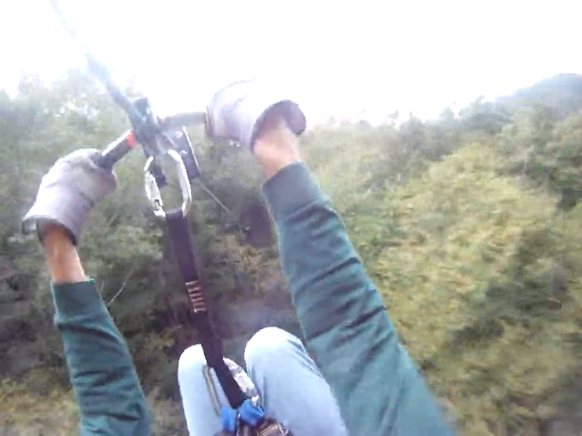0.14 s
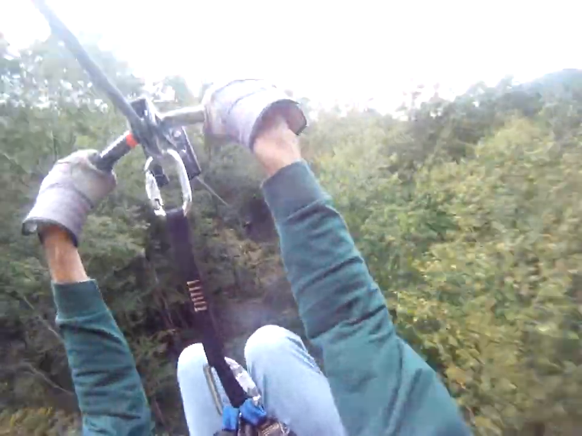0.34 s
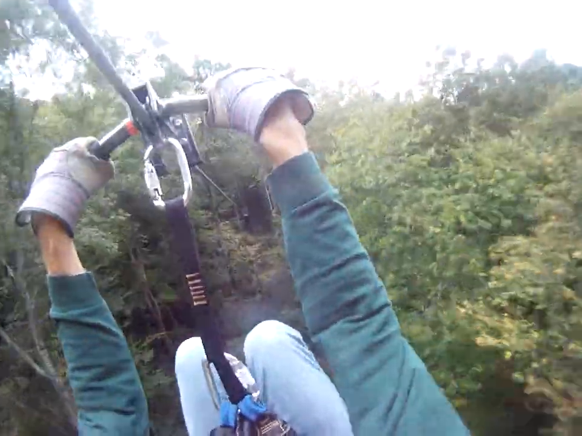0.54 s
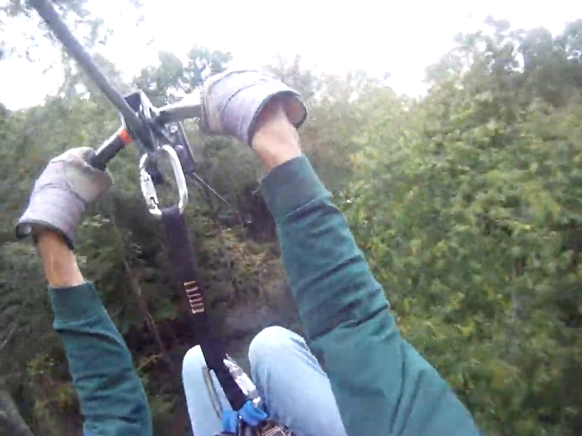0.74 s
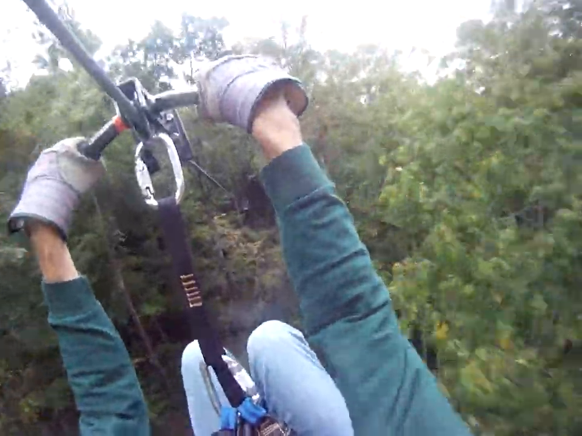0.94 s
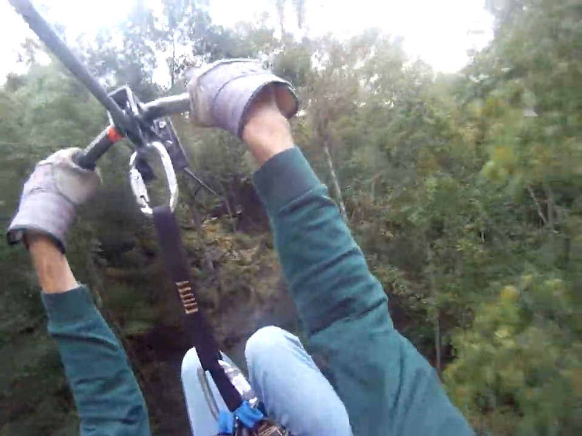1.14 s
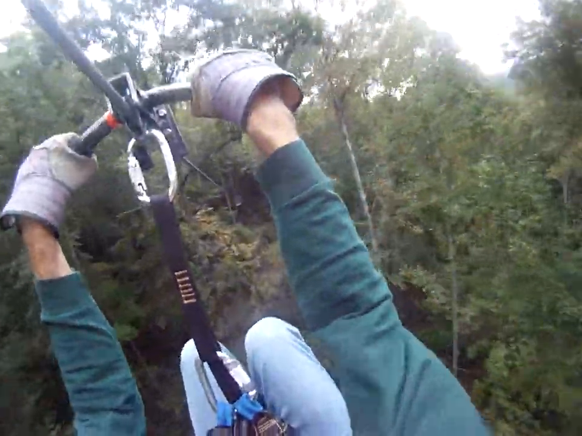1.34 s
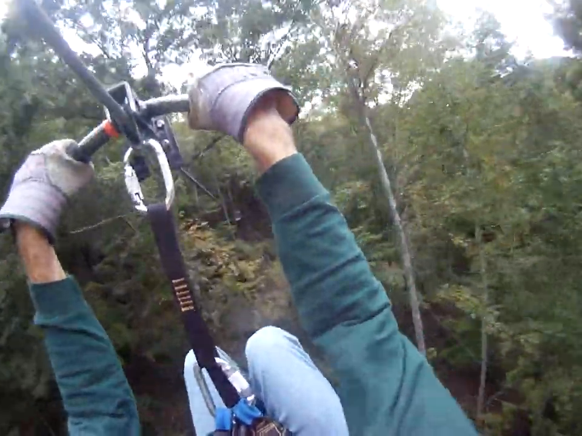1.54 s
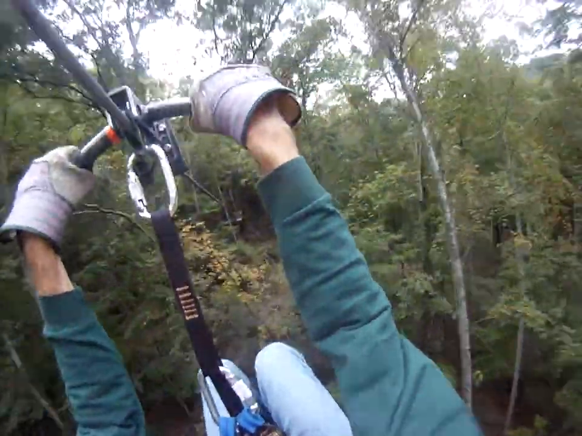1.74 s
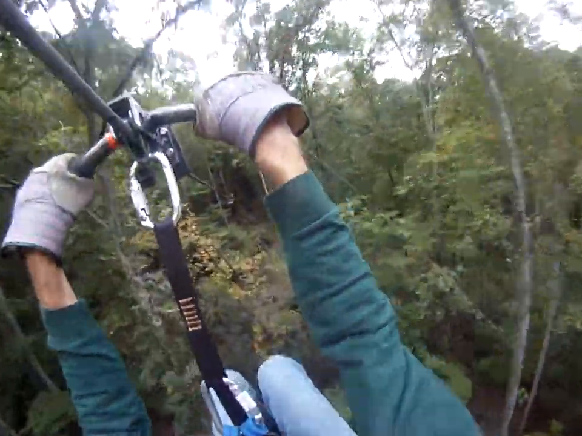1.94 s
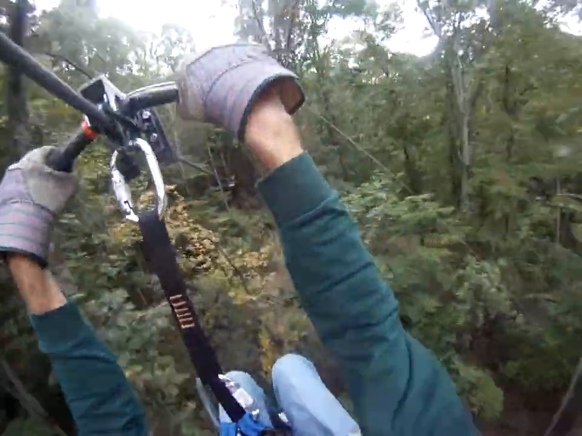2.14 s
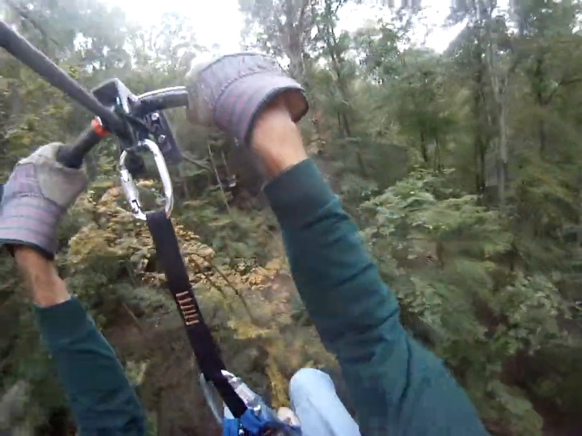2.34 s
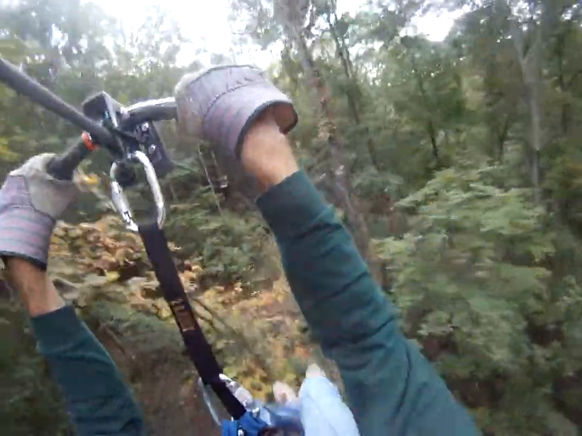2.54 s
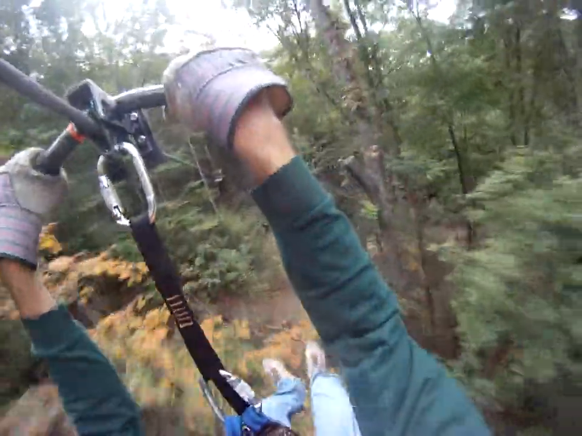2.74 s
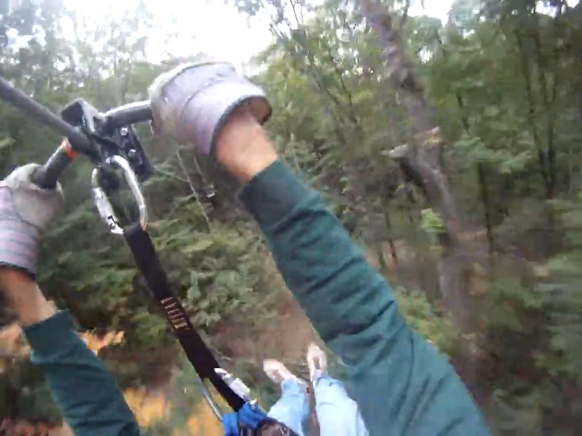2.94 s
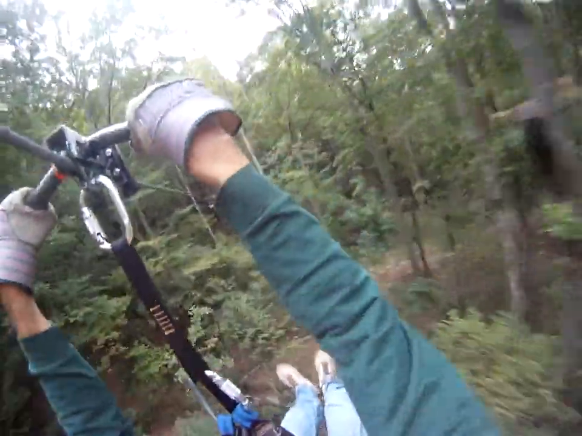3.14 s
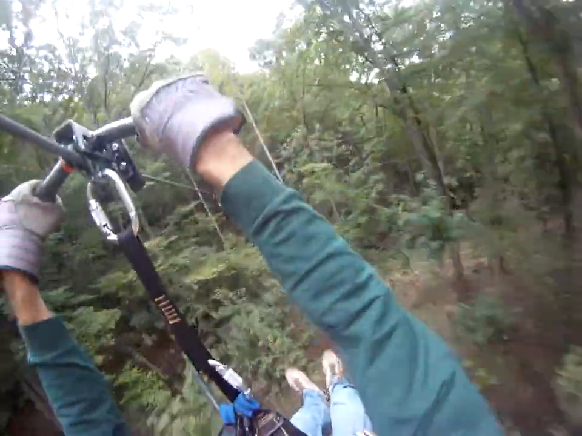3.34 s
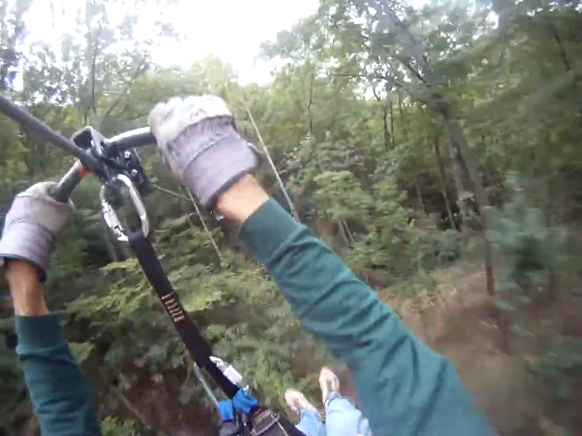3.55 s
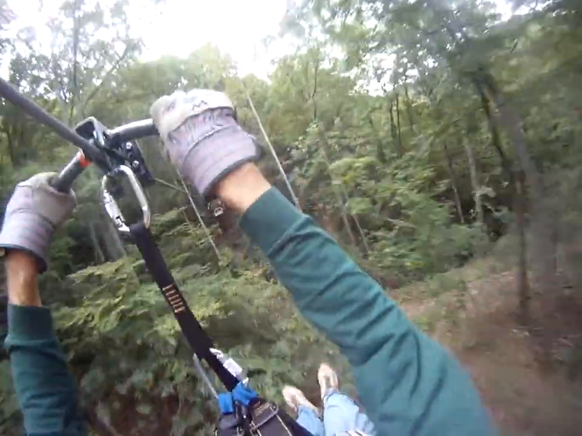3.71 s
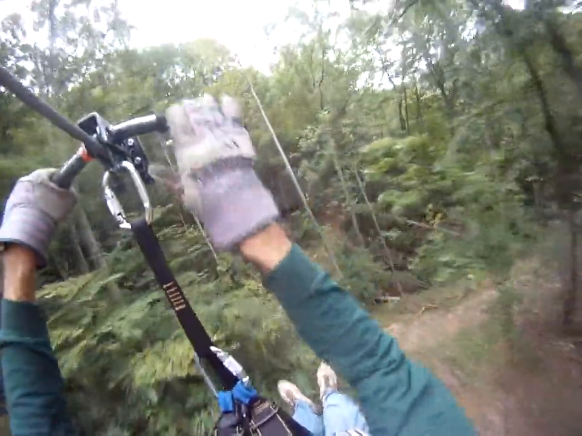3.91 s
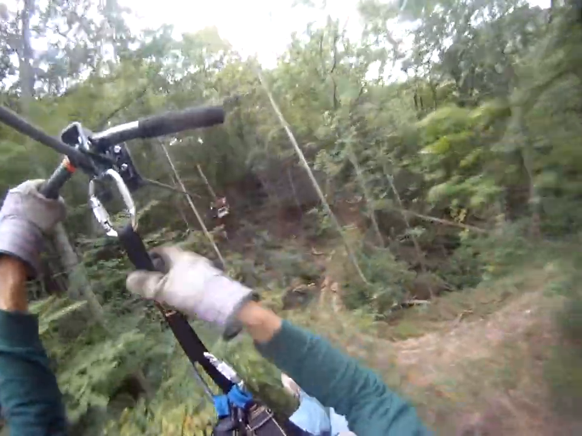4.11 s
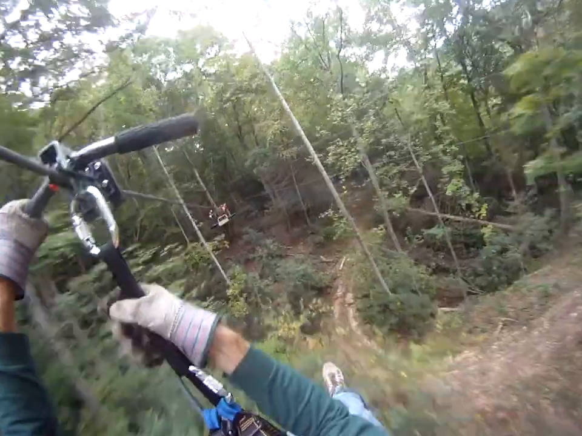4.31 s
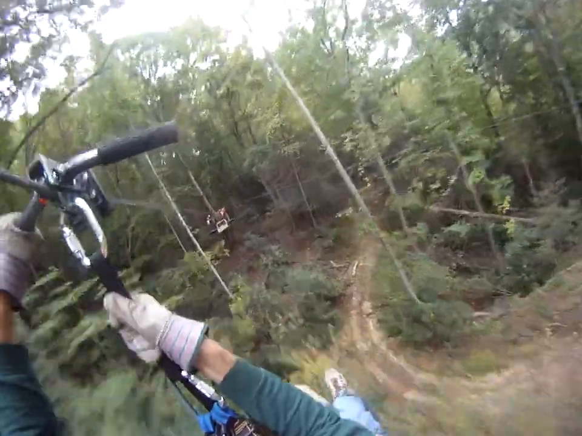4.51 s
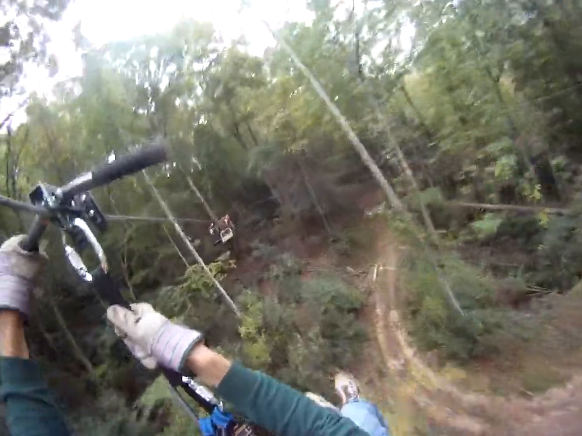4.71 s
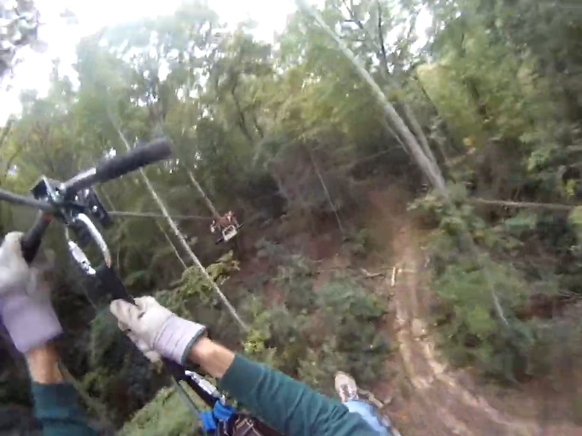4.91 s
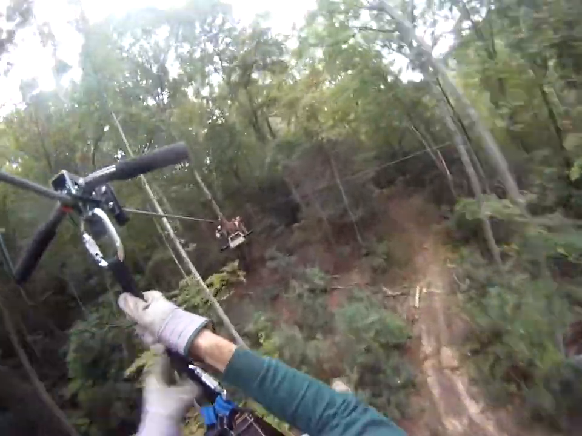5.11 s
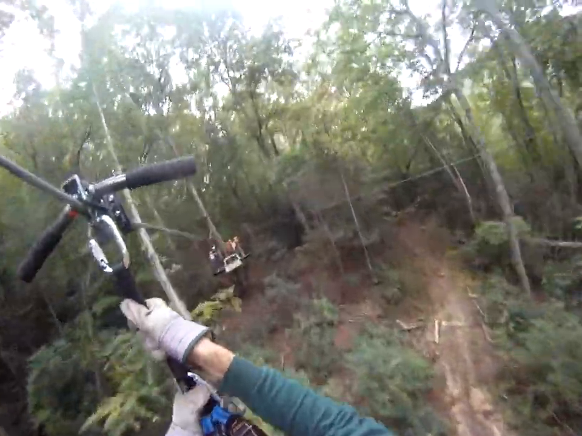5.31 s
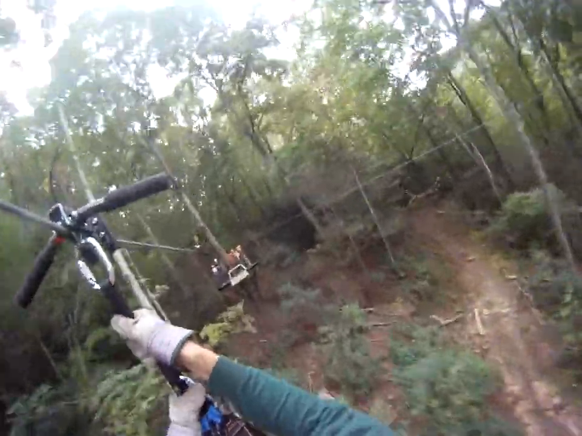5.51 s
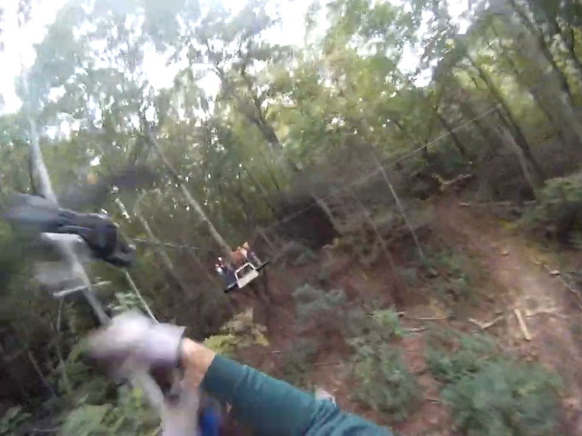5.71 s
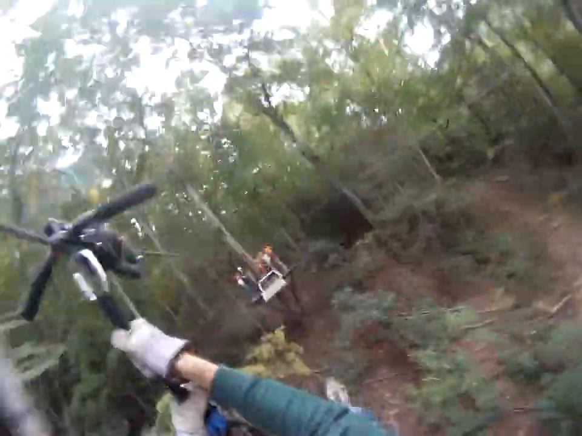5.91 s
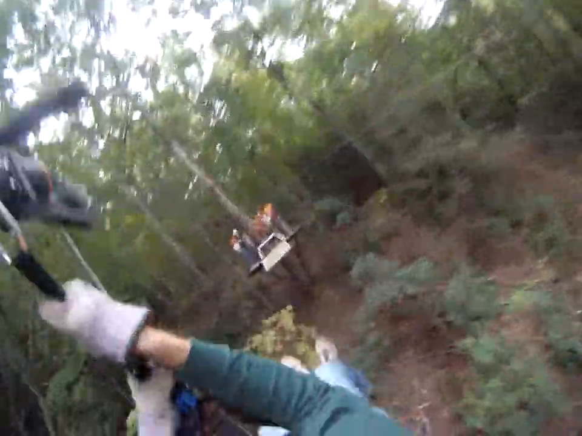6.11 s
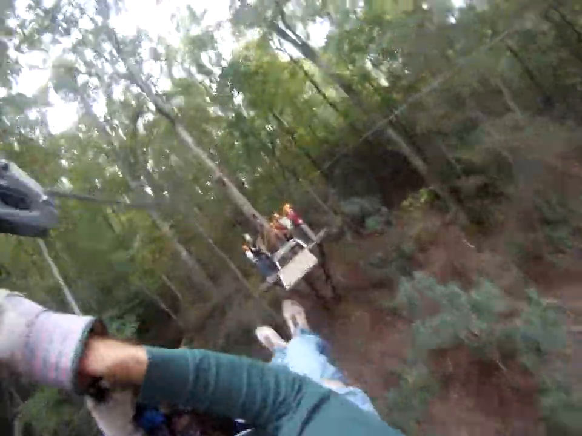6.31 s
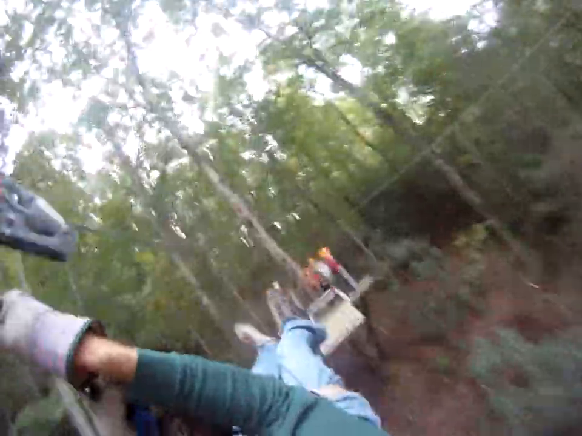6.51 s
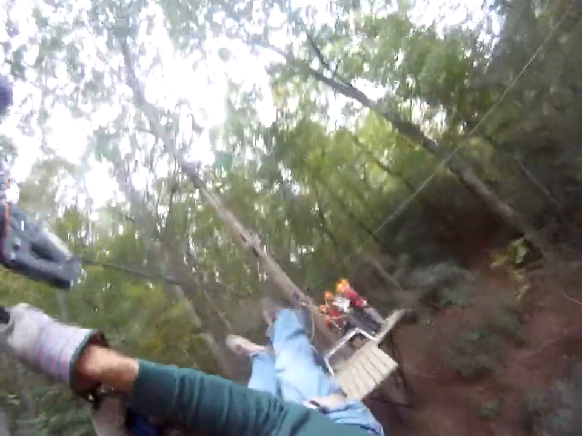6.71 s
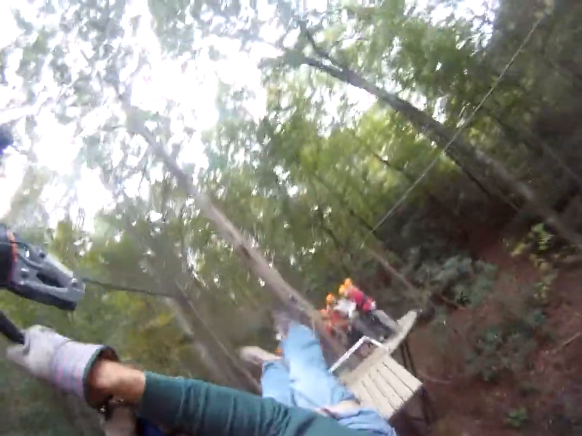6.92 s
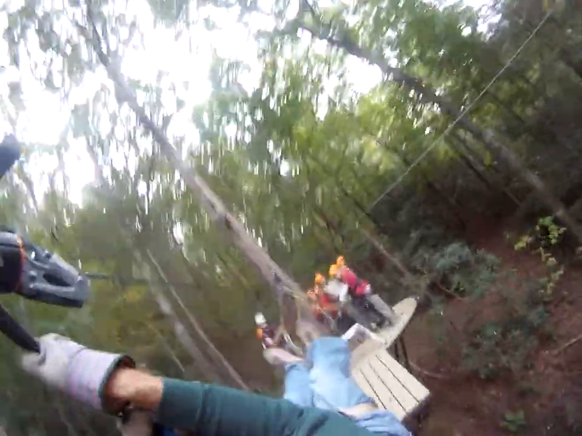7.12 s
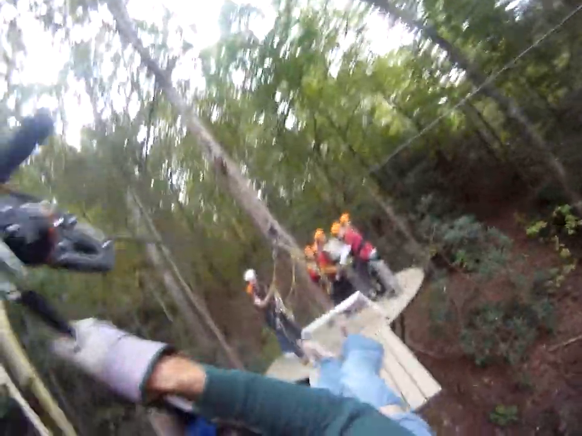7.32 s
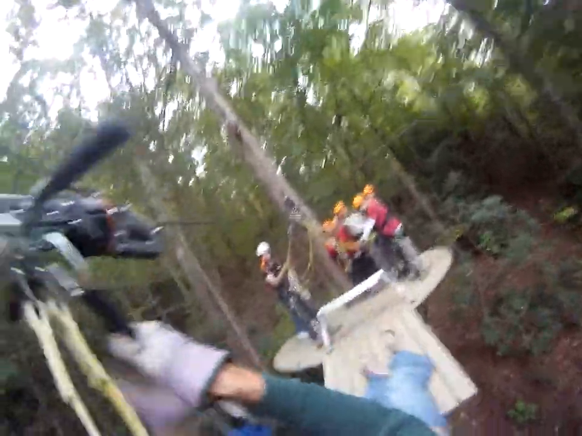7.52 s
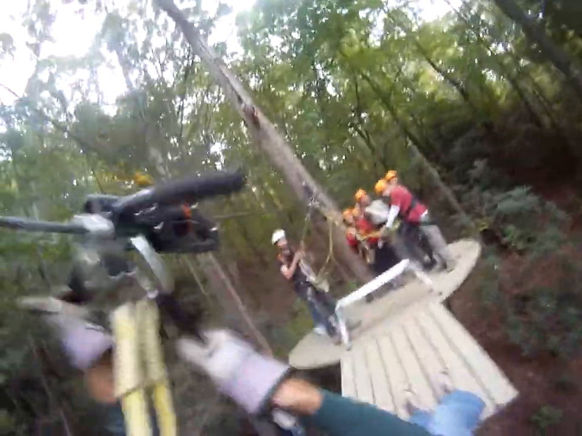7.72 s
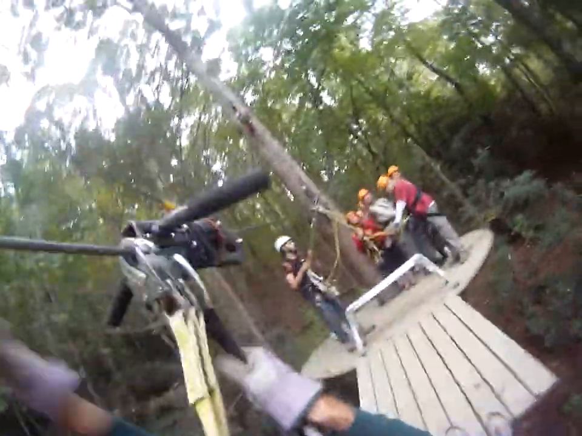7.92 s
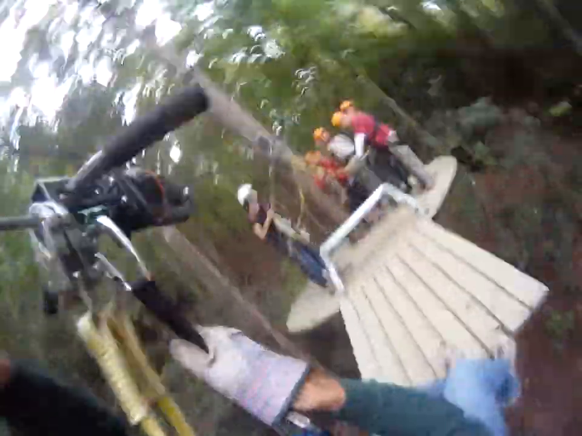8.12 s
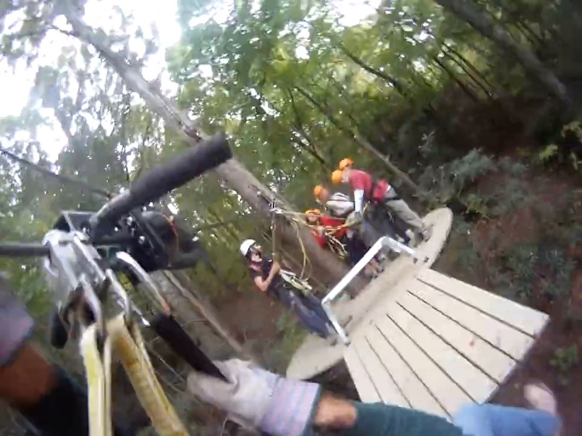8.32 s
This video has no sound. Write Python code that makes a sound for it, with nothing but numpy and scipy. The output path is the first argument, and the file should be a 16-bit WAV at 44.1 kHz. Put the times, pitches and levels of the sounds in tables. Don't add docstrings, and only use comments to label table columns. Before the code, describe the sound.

A bright, buzzing zip-line whir fills the first part, with gusts rumbling against the microphone case and brief squeaks from dry wheels. A sudden cluster of metal bangs and thumps marks the brake, followed by short squeals, a hard knock and a juddering scrape that slows down. Only soft rattles, fabric rubs and faint wind remain. The sound is lo-fi, with gritty, mirrored treble.

```python
import sys
import numpy as np
from scipy import signal
from scipy.fft import rfft, irfft, next_fast_len
from scipy.io import wavfile
from scipy.ndimage import uniform_filter1d

SR = 44100
rng = np.random.default_rng(int(sys.argv[2]) if len(sys.argv) > 2 else 0)


def nominal_scale(level):
    x = np.asarray(level, float) / 20
    return 10 ** x


def generate_wav(signal):
    frames = np.transpose(np.atleast_2d(signal))
    scaled = np.clip(frames, -1, 1) * 32767
    pcm = np.round(scaled).astype(np.int16)
    wavfile.write(sys.argv[1], SR, pcm)


N = 368235
T = np.arange(N) / SR
HOLD_RATE = 12000
BRAKE_S = 5.797


def noise():
    return rng.standard_normal(N)


def unit(x):
    return x / np.sqrt(np.mean(x ** 2))


def smooth_twice(x, size):
    return uniform_filter1d(uniform_filter1d(x, size), size)


def walk(rate):
    hold = int(SR / rate)
    levels = rng.standard_normal(N // 100)[:N // hold + 1]
    return unit(smooth_twice(np.repeat(levels, hold), hold)[:N])


def ring(x, modes):
    size = next_fast_len(N)
    f = np.arange(size * HOLD_RATE // (2 * SR)) * SR / size
    power = 0
    for hz, width, db in modes:
        detune = (f - hz ** 2 / (f + 1)) / width
        power = power + (nominal_scale(db) / (1 + detune ** 2)) ** 2
    return irfft(rfft(x, size)[:len(f)] * np.sqrt(power), size)[:N]


def columns(table):
    s, *cols = np.transpose(table)
    return [np.interp(T, s, c) for c in cols]


def window(s, length, edge_s):
    return np.clip(np.minimum(T - s, s + length - T) / edge_s, 0, 1)


def gate(events, edge_s):
    return sum(nominal_scale(db) * window(s, length, edge_s) for s, length, db in events)


def add(out, s, x):
    i = int(s * SR)
    out[i:i + len(x)] += x[:N - i]


# time in seconds, beat in Hz.
STRAND_BEAT = [(0, 924), (.66, 935), (.85, 955), (1.32, 964), (1.67, 961), (2.2, 998.6), (3.6, 985),
               (4.3, 968), (5.05, 953), (5.2, 920), (5.79, 909), (6.2, 743.4), (6.5, 591), (6.95, 411.3),
               (7.4, 268.4), (7.8, 149.4), (8.35, 60)]


def strand_hz():
    return columns(STRAND_BEAT)[0]


# start in seconds, length in seconds, rise in dB.
GUSTS = [
    (-.1, 0.81, 2.5),
    (1.312, 0.55, 2),
    (1.994, .7, 0),
    (3.5, 0.58, 1.5),
    (5.302, 0.56, -1),
    (6.0, .5, 2),
    (7.55, 0.57, 3.5),
]


def airflow(swing):
    hz = strand_hz()
    gusts_db = sum(db * window(s, length, 0.18) for s, length, db in GUSTS)
    full_speed_db, shelter_db, sway_db = -31, -2.5, -44.5
    moving = nominal_scale(full_speed_db + shelter_db * swing) * (hz / hz.max()) ** 1.9
    return gusts_db + 20 * np.log10(np.hypot(moving, nominal_scale(sway_db)))


# centre in Hz, width in Hz, level in dB.
DEEP_RUMBLE = [(30.3, 22, 0.5), (65, 59.6, -1)]
# centre in Hz, width in Hz, level in dB.
CAVITY_HUM = [(126, 57, -1.5), (174.2, 42.5, 2), (334, 280, -21.5)]


def wind(db):
    gust = 1.3 * walk(13)
    deep_db = 0.87 * (db + 30.0) - 30.0 + gust
    deep = nominal_scale(deep_db) * unit(ring(noise(), DEEP_RUMBLE))
    hum_db = 1.62 * (db + 29.5) - 32.5 + gust + 1.4 * walk(16)
    return deep + nominal_scale(hum_db) * unit(ring(noise(), CAVITY_HUM))


# start in seconds, length in seconds, level in dB.
SCUFFS = [
    (5.82, .1, -33.5),
    (5.93, 0.196, -43),
    (7.89, 0.068, -48),
    (8.12, .09, -48.5),
    (8.29, .06, -53),
]
# centre in Hz, width in Hz, level in dB.
SCUFF_COLOUR = [(1040, 390, 3), (1820, 710, -5.5), (3400, 1800, -13)]


def scuffs():
    return gate(SCUFFS, 0.009) * nominal_scale(4.2 * walk(250)) * unit(ring(noise(), SCUFF_COLOUR))


# time in seconds, signed size,
# length in seconds.
JOLTS = [(5.83, 0.15, 0.014), (5.855, -0.15, 0.00069), (5.863, -0.31, 0.004), (5.905, -0.55, 0.00062),
         (5.884, 0.06, 0.013), (5.908, 0.56, 0.0058), (5.945, -0.08, .04), (7.684, -0.022, 0.041),
         (7.75, 0.045, 0.035), (7.793, -0.054, 0.022), (7.976, .07, 0.015), (8.015, -0.07, 0.013),
         (8.053, .065, 0.012), (8.1, 0.01, .008), (8.17, .03, .015), (8.189, -0.032, 0.011),
         (8.263, .025, 0.026)]


def jolts():
    return sum(push * np.exp(-(2 * (T - s) / length) ** 2) for s, push, length in JOLTS)


def strike_time():
    return np.arange(int(.15 * SR)) / SR


def ping(hz, t60, rough=0.25, rise=0.00022):
    t = strike_time()
    rattle = smooth_twice(rng.standard_normal(len(t)), 80) * np.sqrt(120)
    envelope = (1 - np.exp(-t / rise)) ** 2 * 1000 ** (-t / t60)
    return envelope * (1 + rough * rattle) * np.sin(2 * np.pi * hz * t)


def crack(t60):
    t = strike_time()
    scratch = np.diff(uniform_filter1d(rng.standard_normal(len(t) + 1), size=5))
    return (1 - np.exp(-t / 0.00045)) * 1000 ** (-t / (1.9 * t60)) * scratch


# time in seconds, peak in dB, ring in Hz, thud in dB.
KNOCKS = [(4.96, -18, 1190, -54), (5.841, -15, 1030, -20), (5.856, -15, 1150, -22),
          (5.883, -18, 1160, -16.5), (5.903, -11.5, 999, -16), (6.054, -24, 1170, -37),
          (6.181, -23, 1080, -34), (6.373, -6, 1100, -15), (6.384, -10.5, 1080, -20),
          (6.584, -19.5, 1130, -33), (6.983, -18.5, 1040, -47), (7.413, -29, 1160, -43),
          (7.836, -32, 1120, -53), (7.902, -24, 1030, -53), (7.925, -36, 990, -52),
          (8.124, -23.5, 1190, -29), (8.135, -21.5, 999, -39), (8.167, -32, 1240, -51),
          (8.196, -44, 1190, -33), (8.301, -41, 980, -45)]


def knocks():
    out = np.zeros(N)
    t60 = 0.023
    for s, db, hz, thud_db in KNOCKS:
        case = ping(hz, t60, rise=0.00086)
        case += nominal_scale(-8) * ping(1.3 * hz, t60, rise=0.0013)
        case += nominal_scale(-24) * ping(0.79 * hz, t60, rise=0.002)
        case += nominal_scale(-12) * ping(1.93 * hz, 0.55 * t60, rough=0.99)
        add(out, s, nominal_scale(db + 3) * case)
        add(out, s, nominal_scale(thud_db + 0.5) * ping(171, 0.085, rise=0.0039))
    return out


# time in seconds, peak in dB, mid ring in dB, bright ring in dB.
CLINKS = [(5.7967, -8.5, 5, -12), (5.8516, -10, -2, -9), (5.8656, -6.5, -1, -12), (5.904, -15.5, 9, -10),
          (7.8344, -33, 2, -13), (7.862, -43, 0, -4), (7.9, -38, 3.5, -7), (7.9234, -37.5, -3, -5),
          (7.9533, -38, 2, -7), (7.9764, -42, 8, -1), (7.9962, -45, 0, 0), (8.0192, -37.5, -2, -1.5),
          (8.0711, -39, -14, -11), (8.104, -48, -5, -2), (8.1259, -33.5, -7, -16), (8.1354, -49, 3, -8),
          (8.1534, -41, -3, -7), (8.1654, -45, 7, -9), (8.1724, -42, -12, -2), (8.1858, -32, -4, -9),
          (8.2117, -44, -10, -11), (8.2214, -38, -6, -11), (8.2671, -43, -3, -2), (8.3075, -38, -10, -8)]


def clinks():
    out = np.zeros(N)
    t60 = 0.033
    for s, db, mid_db, bright_db in CLINKS:
        mid = 0.63 * t60
        mid_ring = ping(2158, mid) + nominal_scale(-1.0) * ping(2464, t60)
        add(out, s, nominal_scale(db) * (ping(3545, t60) + nominal_scale(mid_db) * mid_ring))
        bright = ping(4800, t60) + ping(5430, t60) + nominal_scale(12.5) * crack(t60)
        add(out, s, nominal_scale(db + bright_db + 3.0) * bright)
    return out


# start in seconds, end in seconds, start in Hz, end in Hz, level in dB.
WHISTLES = [(.25, 0.758, 1206, 1215, -43.5), (0.306, 1.2, 1550, 1580, -44), (1.329, 1.563, 1825, 1850, -36),
            (2.27, 2.45, 2506, 2510, -30.5), (2.7, 2.94, 4910, 4800, -25), (3.48, 3.658, 4790, 4800, -32),
            (3.9, 4.1, 4900, 4850, -30), (4.121, 4.733, 1572, 1580, -34.5), (4.15, 4.71, 3860, 3920, -28),
            (4.661, 5.04, 1836, 1768, -30), (4.93, 5.35, 1550, 1500, -41), (5.97, 5.977, 2500, 2470, -28),
            (6.0, 6.051, 2150, 2150, -27), (6.052, 6.082, 2520, 2550, -24), (6.066, 6.1, 2132, 2135, -13.5),
            (6.118, 6.136, 2194, 2170, -15.5), (6.165, 6.19, 2420, 2450, -15), (.1, 0.324, 3700, 3730, -24),
            (2.3, 2.473, 3580, 3464, -16.5), (6.22, 6.279, 3526, 3523, -17.5),
            (6.31, 6.4, 2684, 2570, -16.5), (7.668, 7.7, 2124, 2200, -26), (7.972, 7.99, 2110, 2180, -35)]


def whistles():
    out = np.zeros(N)
    waver, flicker_db = 1 + 0.0027 * walk(25), 2.7 * walk(60)
    for start, end, start_hz, end_hz, db in WHISTLES:
        span = slice(int(start * SR), int(end * SR))
        part = (T[span] - T[span][0]) / (end - start)
        hz = (start_hz + (end_hz - start_hz) * part) * waver[span]
        swell = np.sqrt(2 * np.abs(np.sin(np.pi * part)))
        tone = np.sin(2 * np.pi * np.cumsum(hz) / SR)
        add(out, start, nominal_scale(db + flicker_db[span]) * swell * tone)
    return out


def beat():
    waver = 1 + .004 * walk(30) + 0.005 * walk(10)
    return 2 * np.pi * np.cumsum(strand_hz() * waver) / SR


# peak in Hz, width in Hz, rolling dB, braked dB.
PARTIALS = [
    (985, 16, -41.5, -59.5),
    (1940, 120, -43.5, -45),
    (2953, 46, -33.5, -48),
    (3860, 90, -45, -48),
]
# start in seconds, length in seconds, level in dB.
SINGING = [(.1, 0.71, -43), (0.702, .13, -28), (.86, 0.27, -33), (1.06, 0.15, -27.5), (1.26, .11, -24.5),
           (1.35, 0.083, -23), (1.44, 0.11, -33), (1.52, 0.14, -25), (1.62, .15, -26), (3.847, 0.34, -37.5),
           (4.6, 0.27, -32.5), (5.06, 0.99, -25)]


def strands(phase):
    turn = 1 + 0.38 * np.cos(phase / 16)
    hz = strand_hz()
    rolling = T < BRAKE_S
    glide = nominal_scale(1.8 * walk(6) + 3.3 * walk(22) - 1.5)
    glide *= np.clip((T - BRAKE_S) / .5, 0, 1) * np.clip((7.0 - T) / .12, 0, 1)
    out = 0
    for k, (peak_hz, width, db, braked_db) in enumerate(PARTIALS, 1):
        free = nominal_scale(db + 3.2 * walk(8)) / np.hypot(1, (k * hz - peak_hz) / width)
        gain = np.where(rolling, free, nominal_scale(braked_db) * glide)
        if k == 2:
            gain = gain + gate(SINGING, .035) * nominal_scale(3.2 * walk(27.98) - 0.5) * rolling
        out = out + np.sqrt(2) * gain * nominal_scale(1.48 * walk(30)) * turn * np.sin(k * phase)
    return out


# centre in Hz, width in Hz, level in dB.
FREE_MODES = [
    [(3444, 99, -1.5), (3593, 140, -0.5), (3744, 350, -7)],
    [(637, 36, -7.5), (765, 18, -5.5), (985, 84, -4), (1170, 256, -4), (977, 820, -11.5)],
    [(1470, 300, -11), (1550, 200, -7), (1725, 190, -3), (1901, 67, -0.5), (2190, 330, -4),
     (2411, 117, 1.5), (2605, 100, -0.5), (2780, 400, -7)],
    [(4300, 170, -12.5), (4443, 190, -6.5), (4800, 140, -7), (5210, 920, -10.5), (5410, 117, -0.5),
     (6300, 440, -24)],
]
# centre in Hz, width in Hz, level in dB.
BRAKED_MODES = [
    [(3453, 240, -6), (3558, 134, 4), (3700, 460, -9.5)],
    [(914, 106, -0.5), (1080, 330, -5.5), (1240, 190, -2), (895, 640, -13.5)],
    [(1540, 150, -15), (1670, 250, -9.5), (1850, 72, -10), (2135, 103, 2.5), (2340, 450, -8),
     (2470, 150, -3.5), (2550, 120, -4.5), (2840, 320, -15)],
    [(4400, 200, -21), (4380, 300, -4), (4800, 340, -2.5), (5125, 130, 0), (5345, 350, -5),
     (5900, 900, -13.5)],
]
# centre in Hz, width in Hz, level in dB.
TURNED_RIMS = [(4310, 240, -4.5), (4320, 250, -5.5), (4800, 170, -1), (5180, 270, -4), (5380, 260, -3.5),
               (5900, 900, -13.5)]
# level in dB, share of load, change by swing in dB.
FREE_LEVELS = [
    (-18, 1.11, -1.5),
    (-35.5, 0.43, -7),
    (-26.5, 0.17, -1.5),
    (-22, 0.1, -7.5),
]
# level in dB, share of load, change by swing in dB.
BRAKED_LEVELS = [
    (-16, 1.12, -4),
    (-45, 0.61, 0.5),
    (-23.5, 0.92, 3),
    (-28.5, 1, 0.5),
]
OVERTONE_LEVELS = -25.5, -29, -24, -18


def trolley(load_db, swing, phase):
    judder = 0.033 * walk(15) + 0.37 * walk(45) + 0.63 * walk(150)
    braked = np.clip((T - BRAKE_S) / 0.0034, 0, 1)
    swung = np.clip(1.2 * swing, 0, 1)
    overtones = sum(nominal_scale(1.8 * walk(20)) * np.sin(k * phase) for k in range(4, 9))
    overtones = overtones * np.interp(T, (BRAKE_S, 6.0, 7.2, 7.6), (.3, 1, 1, .1))
    judder = judder * (1 + 0.35 * braked)

    def gain(db, share, swing_db):
        return nominal_scale(db + 1.2 + share * load_db + swing_db * swing)

    out = 0
    parts = zip(FREE_MODES, BRAKED_MODES, FREE_LEVELS, BRAKED_LEVELS, OVERTONE_LEVELS)
    for free, pressed, free_level, pressed_level, overtone_db in parts:
        contact = (noise() + nominal_scale(overtone_db) * overtones) * nominal_scale(judder + 1.05 * walk(25))
        rolling = unit(ring(contact, free))
        if free is FREE_MODES[-1]:
            rolling = (1 - swung) * rolling + swung * unit(ring(contact, TURNED_RIMS))
        scraping = unit(ring(contact, pressed))
        out = out + (1 - braked) * gain(*free_level) * rolling
        out = out + braked * gain(*pressed_level) * scraping
    return out


# time in seconds, wheel load in dB, swing of the rider off the trolley (0-1).
RIDE = [(0, -2.5, 0.36), (1.1, -2.5, 0), (2.0, -0.5, 0), (2.45, 0, 0.01), (3.0, 1, 0), (3.7, 2, 0.21),
        (4.3, -0.5, 0.45), (4.95, -3, 0.68), (5.78, -2.5, 0.9), (5.81, -2, 1.3), (6.15, 1, 1.16),
        (6.4, 1.5, 0.8), (6.56, 0, 0.89), (7.05, -4.5, 1.2), (7.3, -8, 0.47), (7.7, -16.5, 1.2),
        (8.1, -38, 1), (8.35, -34, 0.9)]


def scene():
    load_db, swing = columns(RIDE)
    phase = beat()
    since_duck = T - 5.915
    duck = nominal_scale(-10 * np.clip(np.minimum(since_duck / 0.005, 1 - since_duck / 0.16), 0, 1))
    steady = wind(airflow(swing)) + strands(phase) + trolley(load_db, swing, phase)
    mix = duck * steady + scuffs() + jolts() + knocks() + clinks() + whistles()
    return mix[None]


def band_limit(x):
    return signal.sosfilt(signal.butter(12, 16300, fs=SR, output="sos"), x)


def record(dry):
    carrier_rate = 48000
    slow = signal.resample_poly(dry[0], HOLD_RATE, SR)
    slow = slow / (1 + np.abs(slow / .84) ** 6) ** (1 / 6)
    held = np.repeat(slow, carrier_rate // HOLD_RATE)
    x = signal.resample_poly(held, SR, carrier_rate)[None, :N]
    top_cut = signal.ellip(14, .3, 70, 15275, fs=SR, output="sos")
    x = signal.sosfilt(top_cut, x)
    mix = np.pad(x, ((0, 0), (0, N - x.shape[1])))
    return band_limit(mix)


dry = scene()
out = record(dry)
generate_wav(out)
```